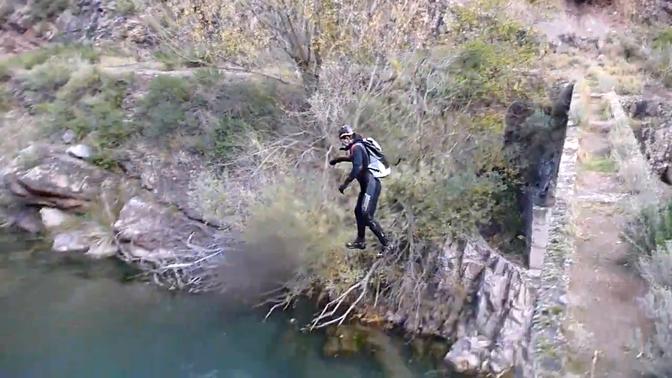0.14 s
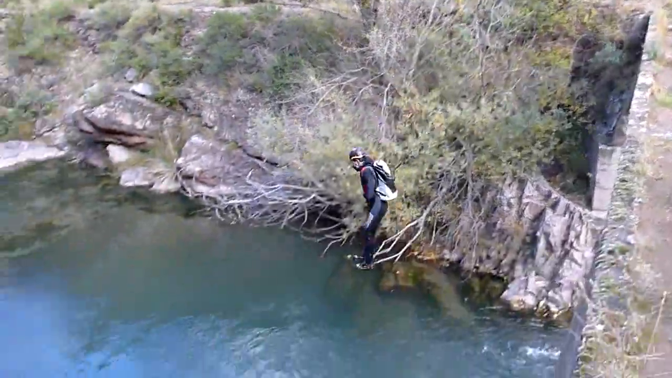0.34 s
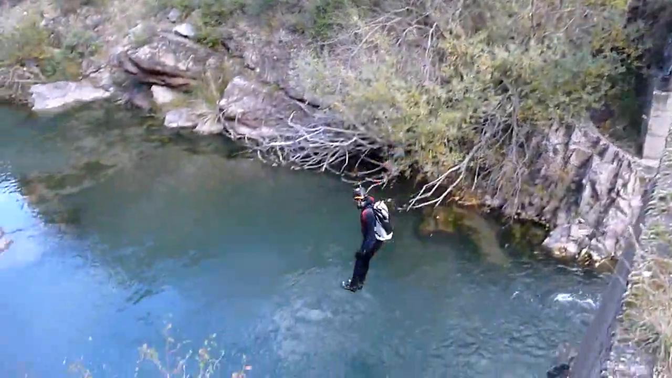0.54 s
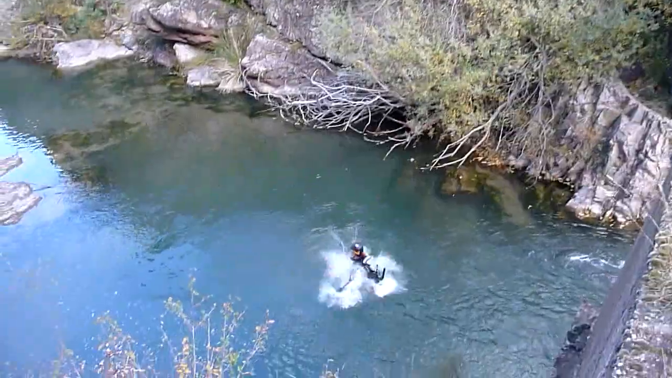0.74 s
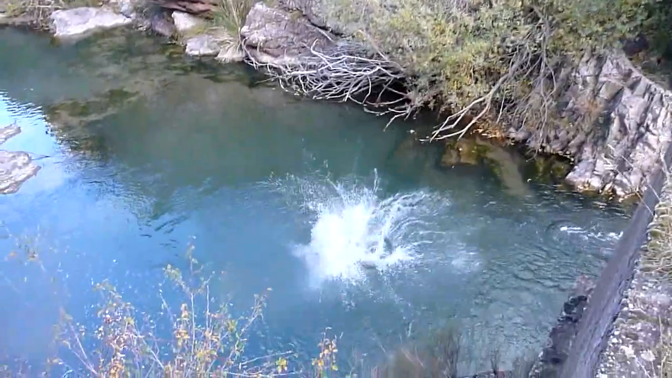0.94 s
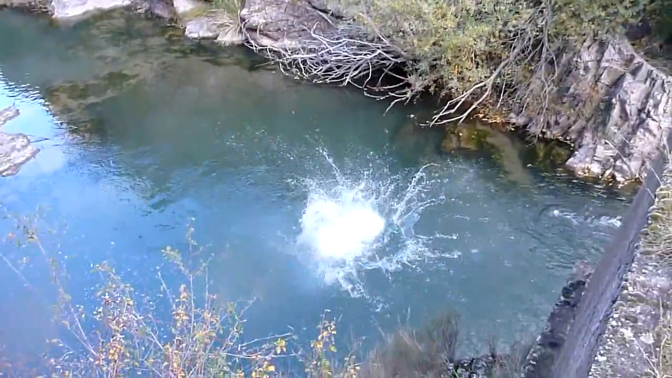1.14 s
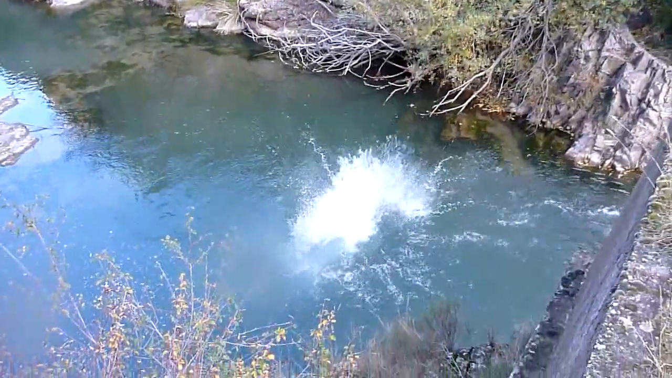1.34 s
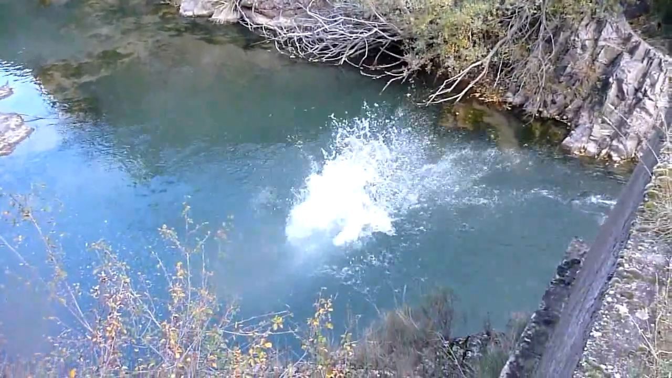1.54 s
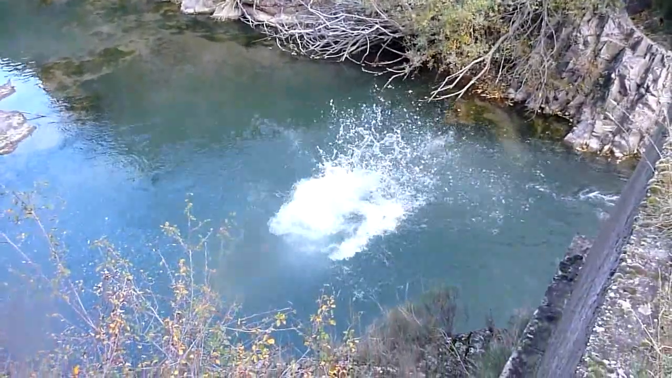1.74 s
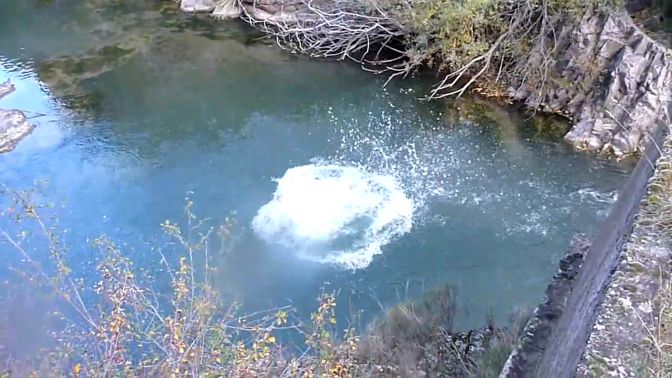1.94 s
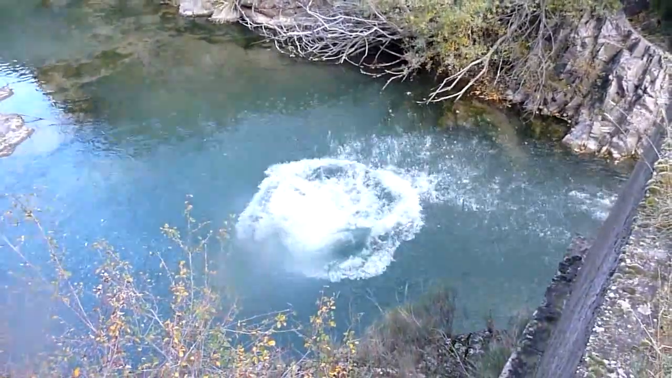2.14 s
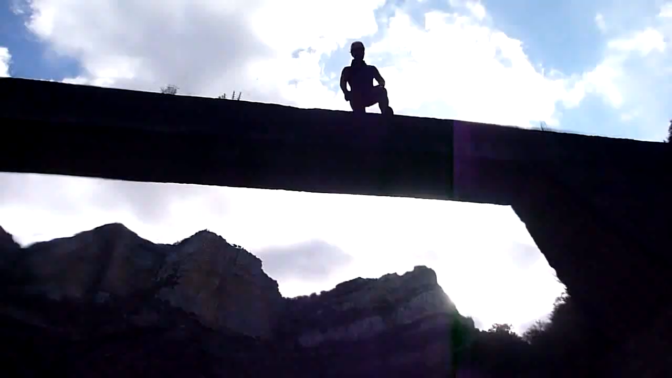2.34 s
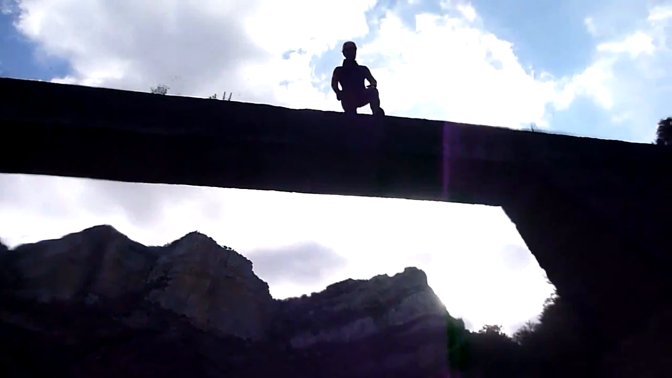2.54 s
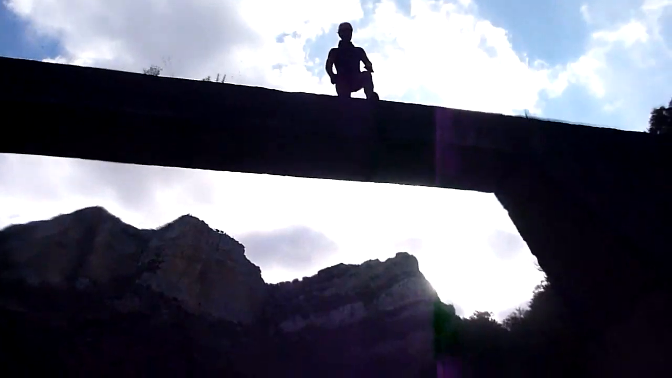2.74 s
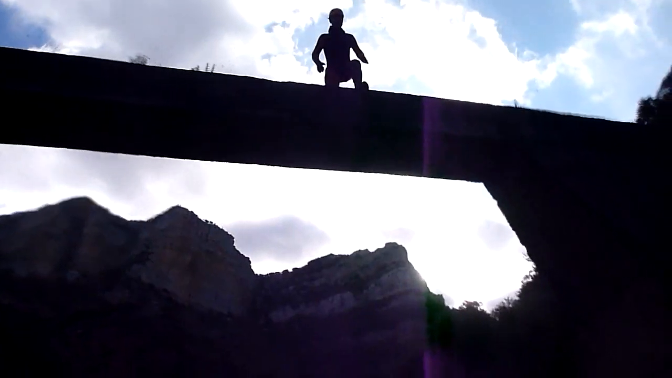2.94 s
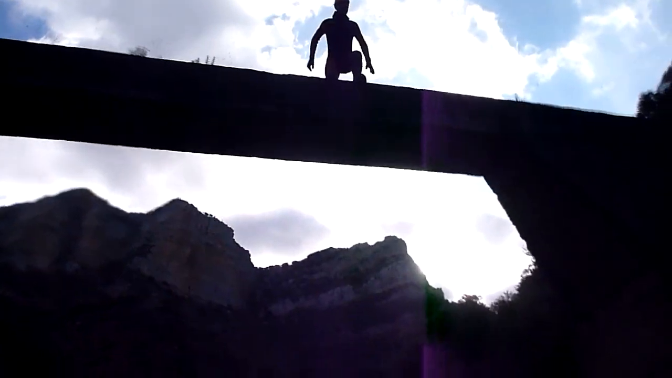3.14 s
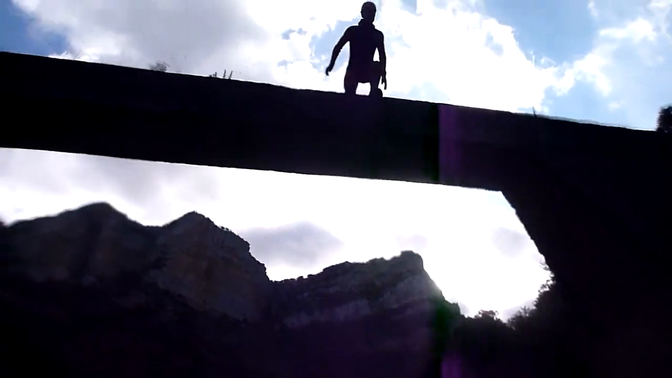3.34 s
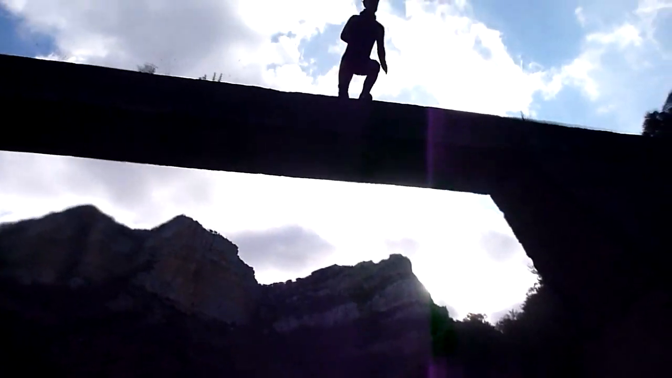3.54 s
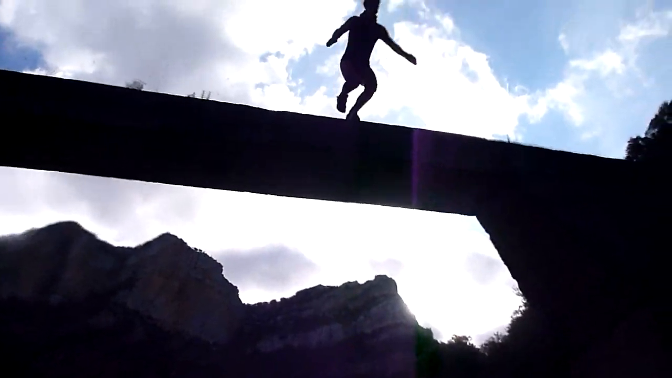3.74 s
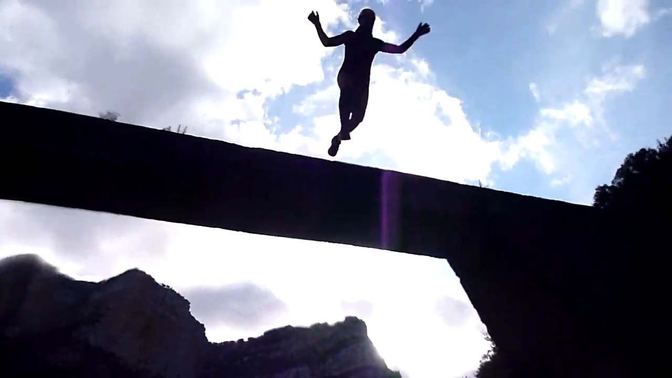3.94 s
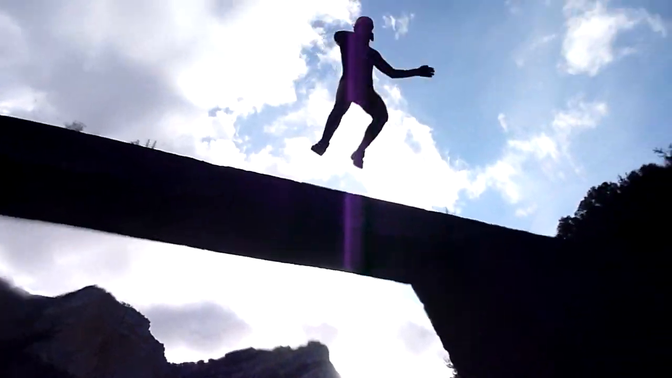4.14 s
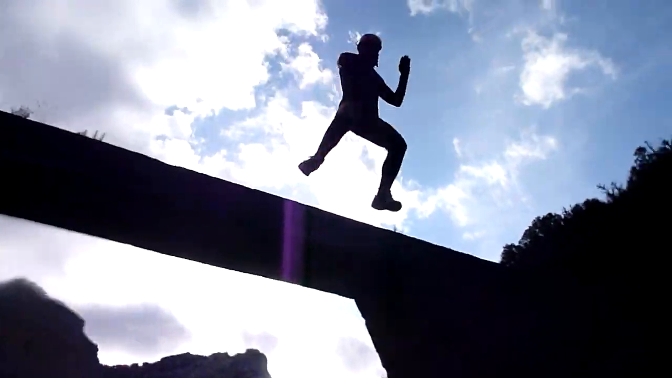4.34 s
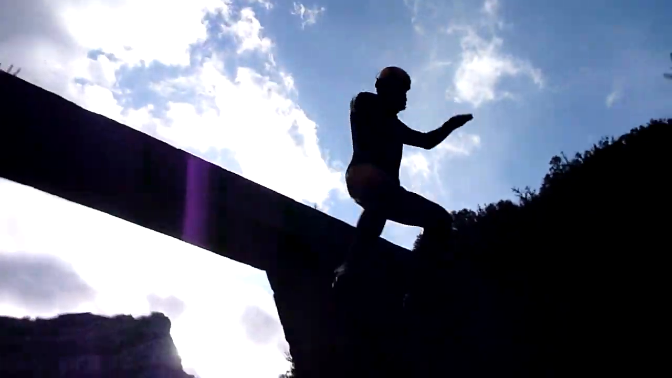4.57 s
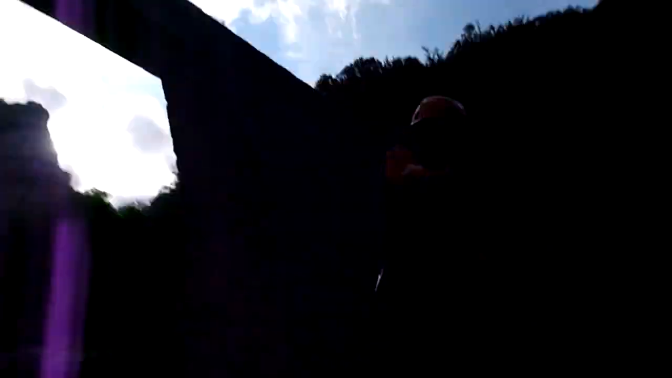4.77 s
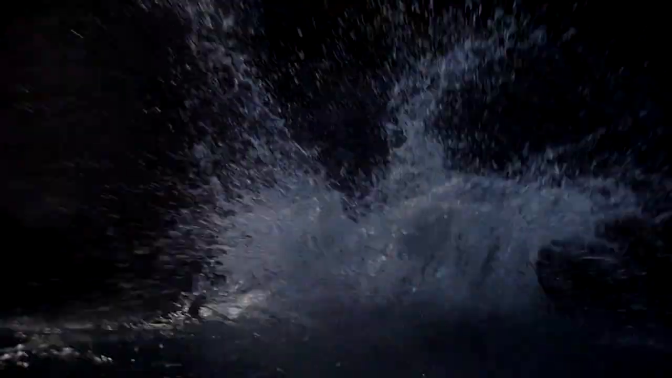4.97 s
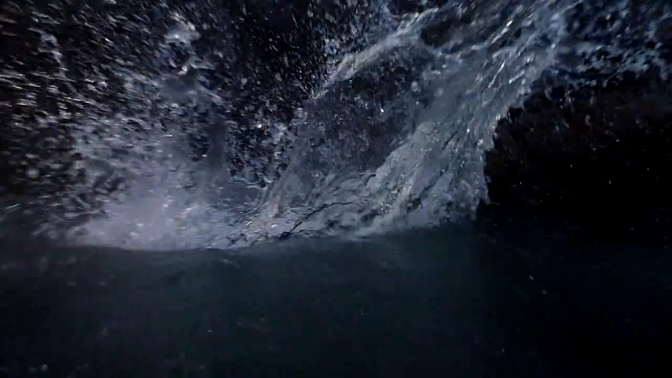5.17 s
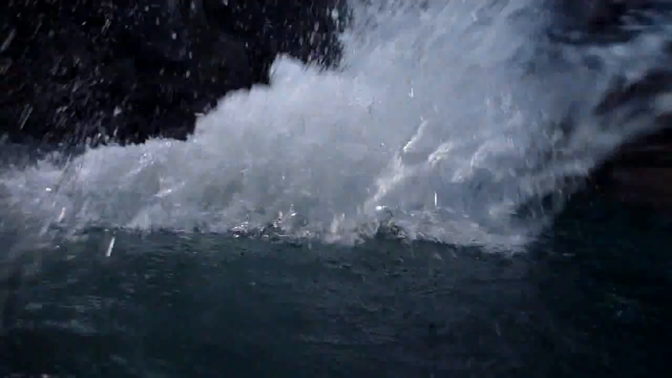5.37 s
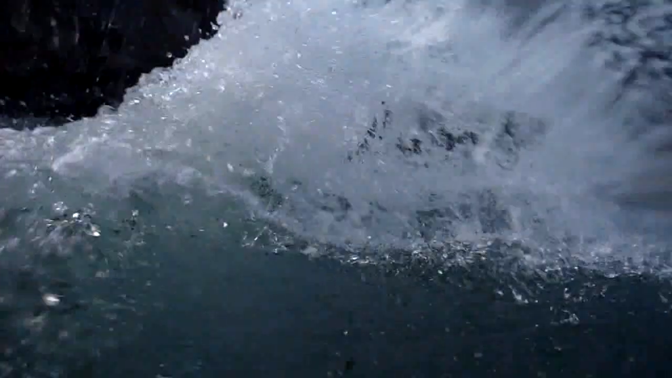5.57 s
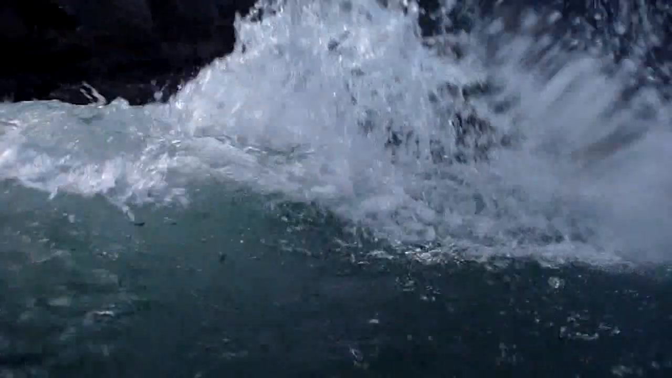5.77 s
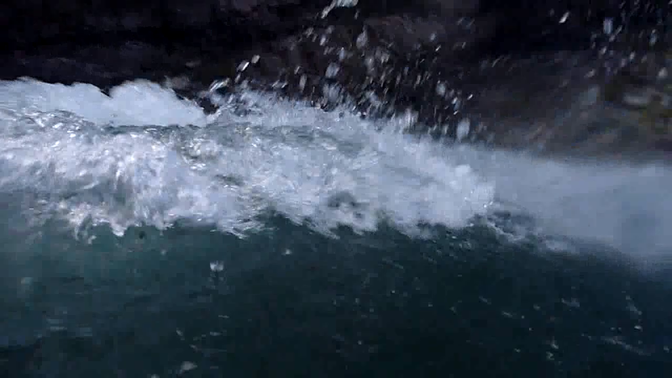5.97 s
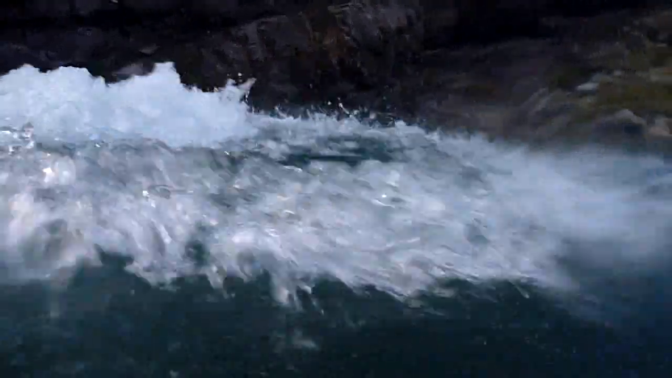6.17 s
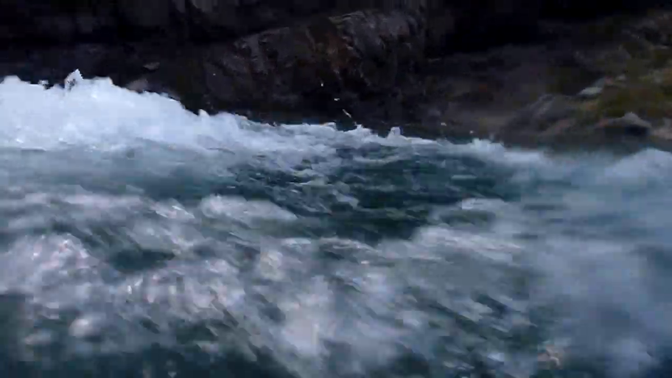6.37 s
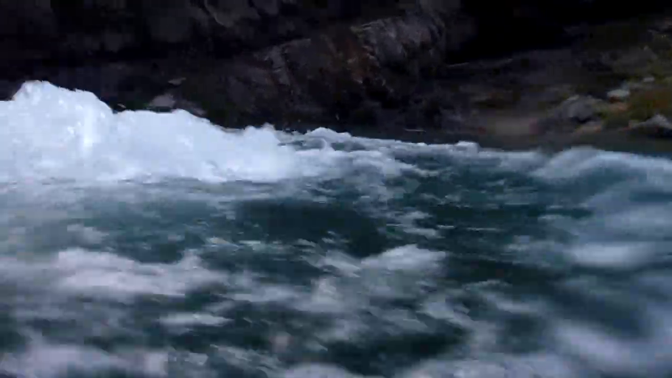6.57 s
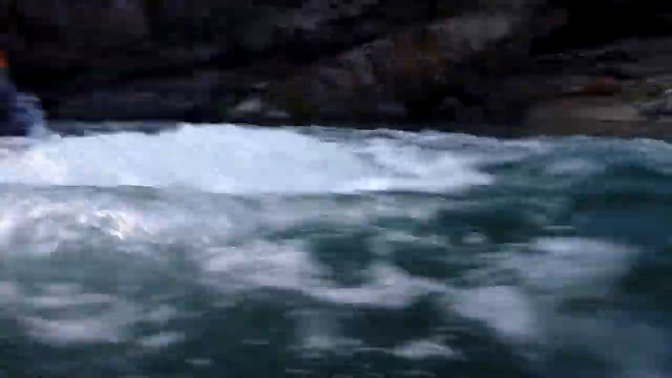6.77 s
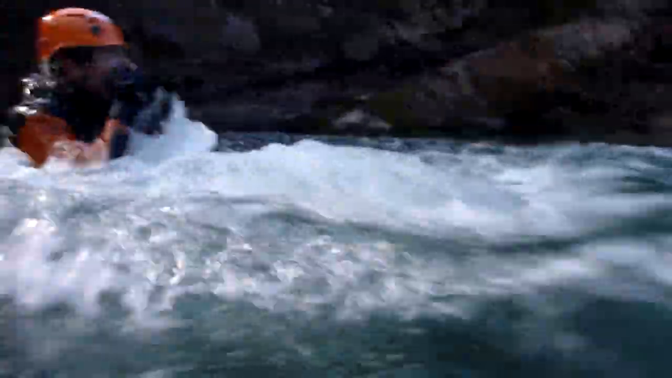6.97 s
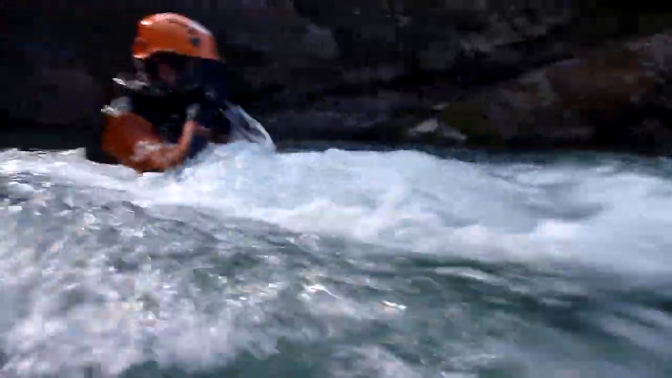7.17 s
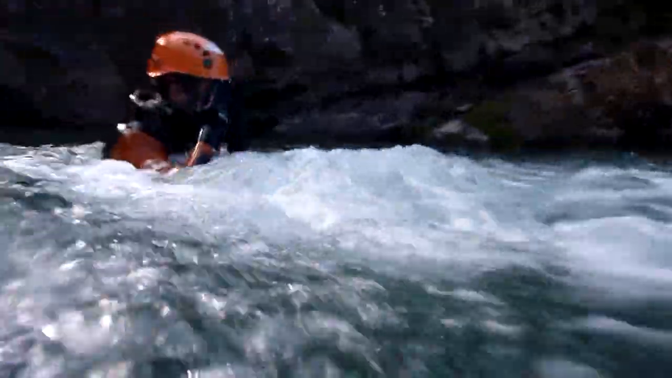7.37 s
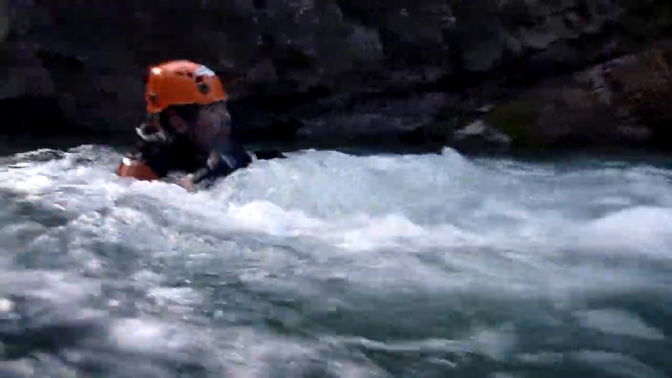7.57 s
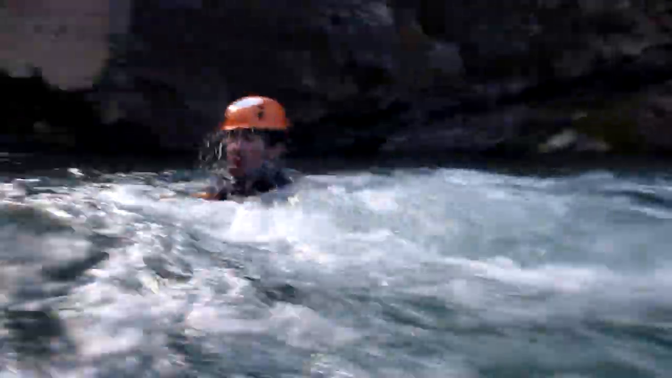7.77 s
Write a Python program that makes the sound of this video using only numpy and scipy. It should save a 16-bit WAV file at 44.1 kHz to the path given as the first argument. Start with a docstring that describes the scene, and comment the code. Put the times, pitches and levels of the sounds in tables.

```python
"""A river gorge: two jumps into a pool, heard by a small waterproof camera from above, then afloat.
Each body slaps the surface, its air cavity collapses into low, resonating bubbles, and spray rains
back over the rush of the river. After the second jump foam gurgles and waves push on the camera.
Drops knock on its shell and hard hits overload it. A brief silence precedes the change of place."""
import sys
import numpy as np
from scipy import signal
from scipy.fft import rfft, irfft, next_fast_len
from scipy.io import wavfile
from scipy.ndimage import uniform_filter1d

SR = 44100
rng = np.random.default_rng(int(sys.argv[2]) if len(sys.argv) > 2 else 0)


def generate_wav(signal):
    """Clip the signal to [-1, 1] and save it as 16-bit WAV at the path in sys.argv[1]."""
    frames = np.transpose(np.atleast_2d(signal))
    scaled = np.clip(frames, -1, 1) * 32767
    pcm = np.round(scaled).astype(np.int16)
    wavfile.write(sys.argv[1], SR, pcm)


N = 344458
T = np.arange(N) / SR
FFT_SIZE = next_fast_len(N, True)
HZ = np.fft.rfftfreq(FFT_SIZE, 1 / SR)
FOAM_START_S, FOAM_RISE_S, FOAM_HOLD_S = 5.79, 0.4, 0.14

# Source spectra, FAR from above and NEAR at the waterline: frequency_hz, relative_density_db
RIVER_FAR_SPECTRUM = [(24, -78.5), (40, -44), (75, -18.5), (152, -8), (234, -10), (315, -7.5), (352, -6),
                      (432, -8), (1930, -14.5), (2830, -16.5), (3980, -19), (9000, -46), (11700, -76),
                      (19800, -120)]
RIVER_NEAR_SPECTRUM = [(24, -69), (40, -24.5), (119, -10), (240, -3.5), (1370, -0.5), (1930, -6.5),
                       (2530, -9.5), (4070, -28.5), (4660, -21.5), (5850, -27.5), (7010, -22),
                       (9000, -35.5), (11700, -65), (19800, -120)]
CAVITY_FAR_SPECTRUM = [(21, -50.5), (35, -14), (129, 1), (225, -1.5), (258, 2), (379, -3), (450, -6),
                       (580, -45), (990, -120)]
CAVITY_NEAR_SPECTRUM = [(18, -42), (30, -20), (91, -6), (120, -11), (200, -4), (319, -6.5), (386, -7),
                        (520, -11), (680, -31), (1140, -120)]
SPRAY_FAR_SPECTRUM = [(88, -28), (150, -10), (336, -4), (581, -6), (804, -2.5), (1040, -5), (2250, 3),
                      (4860, -27), (6610, -25), (7450, -22.5), (9000, -40), (11700, -42), (19800, -120)]
SPRAY_NEAR_SPECTRUM = [(65, -42), (110, -13.5), (314, -1.5), (695, -4.5), (1040, 1.5), (2670, -2.5),
                       (2870, -8.5), (5080, -16), (6000, -22), (6950, -13.5), (8060, -23), (9000, -21.5),
                       (11700, -51), (19800, -120)]
FOAM_SPECTRUM = [(35, -48), (60, -20), (182, -8.5), (509, -2.5), (996, -3.5), (1390, -2.5), (1950, -0.5),
                 (2900, -11.5), (3970, -16), (4410, -19.5), (6850, -20.5), (9000, -28), (11700, -49),
                 (19800, -120)]
RUMBLE_SPECTRUM = [(15, -19), (35, -5), (70, 4.5), (120, -0.5), (200, -2.5), (400, -32), (900, -93)]
# Impacts of a body on water: start_s, push_db, push_hz, push_decay_s, heave_db, heave_hz,
# heave_decay_s, crack_db, crack_decay_s, crack_top_hz
BODY_SLAPS = [(0.7694, 1, 980, 0.00088, -3.5, 229, 0.0041, -4.5, 0.0053, 2820),
              (0.8731, -5, 1320, 0.0012, -30, 300, .004, -10.5, 0.0027, 2980),
              (4.862, 17.5, 592, 0.0015, 6, 430, 0.0016, 14.5, 0.0014, 6640)]
# The air cavity behind each body: start_s, murmur_db, pinch_off_db
AIR_CAVITY_FAR = (0.795, -26, -31)
AIR_CAVITY_NEAR = (4.88, -24, -21.5)
# Water thrown up (entry sheet, rain of spray, rebounding jet):
# start_s, attack_s, hold_s, release_s, churn_db, spray_re_churn_db
SURGES_FAR = [(.802, 0.033, 0.033, 0.17, -21, -9), (1.07, 0.12, 0.68, 0.85, -28.5, -6),
              (1.165, .018, .01, .02, -26, -14), (1.93, 0.16, 0.025, 0.49, -26, -4)]
SURGES_NEAR = [(4.875, 0.052, 0.036, 0.04, -22, -5.5), (4.99, 0.061, 0.3, 0.093, -28, -15),
               (5.2, .19, 0.57, 0.33, -19.5, -6.5), (5.86, 0.1, .01, 0.048, -24.5, -7)]
# The current at the waterline, before spray screens it: time_s, rush_db, hiss_re_rush_db
CURRENT_LEVELS = [(2.4, -26, -13.5), (2.9, -29.5, -12.5), (4.4, -27.5, -13.5), (4.7, -30, -12),
                  (4.86, -26.5, -10)]
# Single bubbles close by, the deepest from the cavity: start_s, level_db, pitch_hz, decay_cycles
CLOSE_BUBBLES = [(2.448, -20.5, 811, 18), (5.099, -12.5, 92, 5.3), (5.185, -16.5, 150, 3.7),
                 (5.861, -18, 1030, 20), (5.973, -13, 2583, 15), (6.688, -14, 2290, 5.7),
                 (6.896, -21, 985, 8), (6.941, -13, 2627, 8), (7.397, -13, 1075, 4.6),
                 (7.5484, -14, 2600, 4.9), (7.551, -13.5, 1170, 5), (7.6568, -9.5, 1070, 2.6)]
# Drops striking the shell: start_s, level_db, pitch_hz, decay_s, splatter_ratio
SHELL_DROPS = [(2.5409, 0, 4015, 0.0017, .9), (2.5413, -9, 2650, 0.0016, .5),
               (4.4627, 4.5, 1800, 0.00074, 0.64), (4.963, -19, 2220, .0029, .6),
               (5.074, -18, 5240, .0015, .3), (5.2324, -5.5, 4870, 0.00082, 0.94),
               (5.289, -14, 5060, 0.0018, .4), (5.3325, 1, 2320, .0016, 0.026), (5.39, -9, 4930, .001, .4),
               (6.4022, -1, 3760, 0.00048, 0.76), (6.5729, 2, 1820, 0.00074, 0.28),
               (6.9245, -7, 3940, 0.0016, .6), (7.591, -12, 3220, 0.001, .4)]
# Waves shoving the camera: centre_s, level_db
WAVE_PUSHES = [(6.55, -43), (6.91, -42.5)]
# Resonances and dips of the shell, by direction and wetness: centre_hz, half_width_hz, gain_db
FAR_SHELL = [(3500, 310, 1), (4630, 510, -5.5), (5700, 380, 4), (7350, 300, 5)]
DRY_SHELL = [(553, 79, -7), (1880, 210, -7), (2300, 200, 0), (3450, 340, 3.5), (3970, 130, -6),
             (4790, 370, 7.5), (6670, 270, -9.5), (7300, 280, -2), (8470, 270, 3.5)]
AFLOAT_SHELL = [(1930, 144, -4.5), (2470, 570, 4.5), (3614, 330, 8), (4150, 220, 2), (4800, 190, 1.5),
                (6000, 330, -1.5), (6920, 320, 3), (9400, 350, 6.5)]
WET_SHELL = [(240, 170, 1.5), (1020, 140, 1), (1650, 330, -3), (2580, 540, 0.5), (4190, 430, -7),
             (5440, 420, 2.5), (5730, 250, -1.5), (6960, 370, 4), (8780, 400, -2)]
# Narrow dips of the microphone: centre_hz, half_width_hz, gain_db
MIC_NOTCHES = [(2902, 54, -18), (8010, 216, -18.5)]
# The treble falls away above about 9 kHz: frequency_hz, gain_db
TREBLE_ROLLOFF = [(8800, -0.5), (9800, -9), (11000, -21.5), (16000, -12.5)]


def amp(db):
    """Amplitude grows tenfold for every 20 decibels."""
    return 10 ** (np.asarray(db) / 20)


def unit(x):
    """Normalisation to an rms of 1."""
    return x / np.sqrt(np.mean(x ** 2) + 1e-20)


def curve(points):
    """A spectrum in dB, interpolated over log frequency."""
    hz, db = np.transpose(points)
    return np.interp(np.log(HZ + 1), np.log(hz + 1), db)


def resonances(rows):
    """Cascaded responses add in dB: here bell-shaped peaks and dips."""
    return sum(db * np.exp(-((HZ - hz) / width) ** 2) for hz, width, db in rows)


def colour(x, db):
    """Filtering multiplies the spectrum by a gain at each frequency."""
    return irfft(rfft(x, FFT_SIZE) * amp(db), FFT_SIZE)[:N]


def lowpass(x, hz, order=2):
    """Causal attenuation above a cutoff."""
    return signal.sosfilt(signal.butter(order, hz, fs=SR, output="sos"), x)


def after(s):
    """A unit step, spread over 4 ms."""
    return np.clip((T - s) / .004 + .5, 0, 1)


def surge(start_s, attack_s, hold_s, release_s):
    """An envelope of linear rise, plateau and exponential decay."""
    age = T - start_s
    return np.clip(age / attack_s, 0, 1) * np.exp(-np.maximum(age - attack_s - hold_s, 0) / release_s)


def add(mix, s, sound):
    """Superposition of a sound on the mix, starting at time s."""
    part = mix[round(s * SR):][:len(sound)]
    part += sound[:len(part)]


def wash(patchy_db, flicker_db, size=512):
    """Countless bubbles of random phase merge into noise that swells in patches and flickers."""
    shape = (N // (size // 4) + 5, size // 2 + 1)  # frames, frequency bins
    real, imag, patches = rng.standard_normal((3, *shape))
    patches = unit(uniform_filter1d(uniform_filter1d(patches, size=14, axis=0), size=6, axis=1))
    flicker = unit(uniform_filter1d(rng.standard_normal(shape[0]), size=8))
    field = (real + 1j * imag) * amp(patchy_db * patches + flicker_db * flicker[:, None])
    return unit(signal.istft(field.T, nperseg=size, noverlap=size - size // 4)[1][:N])


def bubbles(per_s, low_hz, high_hz, cycles, spread_db, rise=0.0852, sizes=24):
    """Each bubble is a damped oscillator whose pitch rises as it nears the surface."""
    out = np.zeros(N)
    for hz in np.geomspace(low_hz, high_hz, sizes):
        age = np.arange(int(5 * cycles / hz * SR)) * hz / cycles / SR  # in decay times
        ring = np.exp(-age) * np.sin(2 * np.pi * cycles * age * (1 + rise * age))
        when, strength = rng.random((2000, 2))[:int(per_s * N / SR / sizes)].T
        height = hz * amp(spread_db * np.minimum(-np.log(1 - strength), 4))
        places = (when * N).astype(int)[:, None] + np.arange(len(ring))
        out += np.bincount(places.ravel(), np.outer(height, ring).ravel(), N)[:N]
    return unit(out)


def shaped_noise(x, spectrum_db, top_hz=9350):
    """Spectral shaping: noise takes the given spectrum, with little treble above top_hz."""
    return unit(colour(x, spectrum_db - 10 * np.log10(1 + (HZ / top_hz) ** 70)))


def two_bands(x, low_gain, high_gain, split_hz=2950):
    """A crossover gives the churning water and its fine spray separate envelopes."""
    low = colour(x, -10 * np.log10(1 + (HZ / split_hz) ** 20))
    return low_gain * unit(low) + high_gain * unit(x - low)


def splash_gains(rows):
    """Incoherent surges add in power; returns the gains of churn and spray."""
    powers = [(surge(*shape) * amp([[churn_db], [churn_db + spray_db]])) ** 2
              for *shape, churn_db, spray_db in rows]
    return np.sqrt(sum(powers))


def river_far(level_db=-34.5):
    """At a distance the river's bubbles sum incoherently to a steady rush."""
    rush = wash(patchy_db=-2.2, flicker_db=0.4)
    return amp(level_db) * shaped_noise(rush, curve(RIVER_FAR_SPECTRUM) + resonances(FAR_SHELL))


def slaps(size=3000):
    """Impact radiation: a body gives the surface a damped push, a deeper heave and a crack."""
    out, t = np.zeros(N), np.arange(size) / SR
    for s, push_db, hz, push_s, heave_db, heave_hz, heave_s, crack_db, crack_s, top_hz in BODY_SLAPS:
        push = -np.sin(2 * np.pi * hz * t) * np.exp(-t / push_s)
        heave = -np.sin(2 * np.pi * heave_hz * t) * np.exp(-t / heave_s)
        crack = unit(lowpass(rng.standard_normal(size), top_hz)) * np.exp(-t / crack_s)
        add(out, s, amp(push_db) * push + amp(heave_db) * heave + amp(crack_db) * crack)
    radiated = out - lowpass(out, 130, order=1)  # the open surface radiates little deep bass
    return lowpass(radiated, 6700, order=8)


def cavity(event, spectrum, per_s, cycles, fade_s):
    """Entrained air resonates as large, low bubbles while the cavity opens and then pinches off."""
    s, murmur_db, pinch_db = event
    boil = bubbles(per_s, 33, 598, cycles, spread_db=3, sizes=20)
    murmur = amp(murmur_db) * surge(s, attack_s=0.046, hold_s=0, release_s=0.18)
    pinch = amp(pinch_db) * surge(s + 0.14, attack_s=0.14, hold_s=0.089, release_s=fade_s)
    return unit(colour(boil, curve(spectrum))) * np.hypot(murmur, pinch)


def splash_far():
    """Falling spray traps ringing bubbles, which overlap into a blur at a distance."""
    rain = wash(patchy_db=0.3, flicker_db=-0.4)
    rain += 0.72 * bubbles(3000, 506, 9060, cycles=3.6, spread_db=0)
    spray = shaped_noise(rain, curve(SPRAY_FAR_SPECTRUM) + resonances(DRY_SHELL))
    return two_bands(spray, *splash_gains(SURGES_FAR))


def river_near():
    """At close range single bubble resonances stand out of the rush as a babble."""
    babble = wash(patchy_db=1.25, flicker_db=-0.8)
    babble += 0.5 * bubbles(2500, 245.6, 8260, cycles=4.9, spread_db=2)
    water = shaped_noise(babble, curve(RIVER_NEAR_SPECTRUM) + resonances(AFLOAT_SHELL))
    s, rush_db, hiss_db = np.transpose(CURRENT_LEVELS)
    rush = amp(np.interp(T, s, rush_db))
    hiss = rush * amp(np.interp(T, s, hiss_db))
    return two_bands(water, rush, hiss)


def drops_and_bubbles(overtone_ratio=2.1, overtone_db=-14, bubble_splatter=0.05, size=12000):
    """Impulse response: each drop on the shell or close bubble rings down with a noisy splatter."""
    out, t = np.zeros(N), np.arange(size) / SR
    ringing = [(s, db, hz, cycles / hz, bubble_splatter) for s, db, hz, cycles in CLOSE_BUBBLES]
    for s, db, hz, decay_s, splatter in list(SHELL_DROPS) + ringing:
        decay = np.exp(-t / decay_s)
        overtone = amp(overtone_db) * decay * np.sin(2 * np.pi * overtone_ratio * hz * t)
        ring = np.sin(2 * np.pi * hz * t) + overtone
        noise = unit(lowpass(rng.standard_normal(size), 5100))
        hit = amp(db) * decay * (ring + splatter * noise)
        add(out, s, hit - lowpass(hit, .5 * hz, order=1))  # small sources radiate bass poorly
    return lowpass(out, 8220, order=14)


def swish(centre_s=4.805, width_s=0.054, level_db=-37, hz=5700, width_hz=650):
    """Narrow-band noise swells into a brief, high swish just before the second landing."""
    band = shaped_noise(rng.standard_normal(N), -20 * np.log10(1 + ((HZ - hz) / width_hz) ** 2))
    return amp(level_db) * band * np.exp(-((T - centre_s) / width_s) ** 2)


def splash_near():
    """Damping sets the timbre of the close shower: heavily damped bubbles patter, others plink."""
    shower = wash(patchy_db=0.3, flicker_db=0.95)
    patter = 0.66 * bubbles(2200, 574, 7330, cycles=1.1, spread_db=2.5)
    plinks = 0.5 * bubbles(600, 290, 4115, cycles=9.37, spread_db=1.5)
    spray = shaped_noise(shower + patter + plinks, curve(SPRAY_NEAR_SPECTRUM) + resonances(WET_SHELL))
    return two_bands(spray, *splash_gains(SURGES_NEAR))


def foam(level_db=-22, lap_db=0.74, lap_s=0.21, fade_s=1.67):
    """Pitch varies inversely with bubble size: as wavelets rock foam, large ones gurgle, small tick."""
    froth = wash(patchy_db=0.9, flicker_db=-1)
    gurgle = 0.44 * bubbles(900, 199.7, 4355, cycles=5.74, spread_db=2.5)
    ticks = 0.29 * bubbles(500, 2380, 9600, cycles=3.7, spread_db=4.5)
    lapping = unit(lowpass(rng.standard_normal(N), .5 / lap_s))
    envelope = amp(level_db + lap_db * lapping) * surge(FOAM_START_S, FOAM_RISE_S, FOAM_HOLD_S, fade_s)
    spectrum_db = curve(FOAM_SPECTRUM) + 1.32 * resonances(WET_SHELL)
    return envelope * shaped_noise(froth + gurgle + ticks, spectrum_db)


def buffets(wake_db=-50, fade_s=0.71, width_s=0.056):
    """Pressure fluctuations of the wake and its waves reach the camera as a deep, lumpy rumble."""
    rumble = colour(wash(patchy_db=2.5, flicker_db=-2.5, size=2048), curve(RUMBLE_SPECTRUM))
    wake = amp(wake_db) * surge(FOAM_START_S, FOAM_RISE_S, FOAM_HOLD_S, fade_s)
    waves = sum(amp(db) * np.exp(-((T - s) / width_s) ** 2) for s, db in WAVE_PUSHES)
    return (wake + waves) * unit(rumble)


def gain_control(x, limit_db=-6, release_db_per_s=13, slope=0.62, attack_hz=70, late_s=0.0043):
    """Compression: gain falls just after a peak passes the limit and recovers as the held peak sinks."""
    fall_db = T * release_db_per_s
    held_db = np.maximum.accumulate(20 * np.log10(abs(x) + 1e-9) + fall_db) - fall_db
    excess_db = np.maximum(held_db - limit_db, 0)
    delayed_db = np.interp(T - late_s, T, excess_db)
    return x / amp(slope * lowpass(delayed_db, attack_hz))


def scene(move_s=2.392, silence_start_s=2.205, silence_end_s=2.295, screening_db=-8):
    """Sources superpose at two listening points in turn: high on the bank, then at the waterline."""
    above = river_far() + splash_far()
    above += cavity(AIR_CAVITY_FAR, CAVITY_FAR_SPECTRUM, per_s=700, cycles=2.35, fade_s=0.14)
    afloat = splash_near()
    afloat += cavity(AIR_CAVITY_NEAR, CAVITY_NEAR_SPECTRUM, per_s=900, cycles=2.57, fade_s=0.13)
    screening = amp(screening_db * after(SURGES_NEAR[0][0]))  # the wall of spray hides the river
    afloat += screening * river_near() + buffets() + foam() + swish()
    moved = after(move_s)
    water = (1 - moved) * above + moved * afloat
    audible = 1 - after(silence_start_s) + after(silence_end_s)
    return (audible * (water + slaps() + drops_and_bubbles()))[None]


def record(dry, ceiling=0.83, band_edge_hz=16400):
    """Saturation clips hard hits and the gain dips; notches, treble roll-off and a band limit follow."""
    clipped = dry[0] / (1 + (dry[0] / ceiling) ** 20) ** (1 / 20)
    heard = colour(gain_control(clipped), resonances(MIC_NOTCHES) + curve(TREBLE_ROLLOFF))
    band_limit = signal.firwin(511, band_edge_hz, window=("kaiser", 9), fs=SR)
    return signal.oaconvolve(heard, band_limit, "same")[None]


dry = scene()
out = record(dry)
generate_wav(out)
```